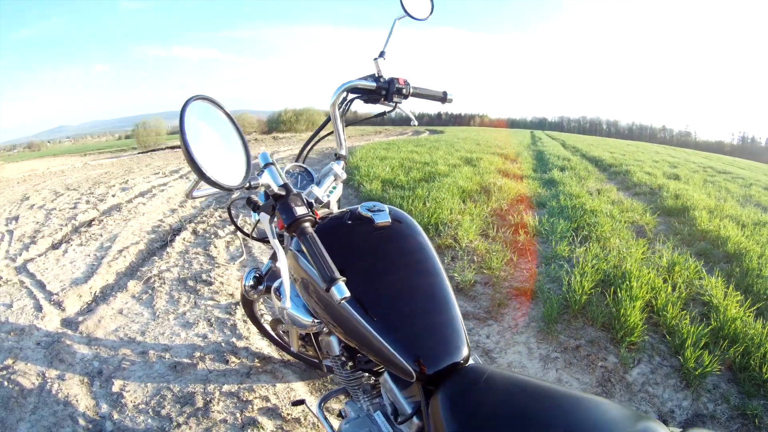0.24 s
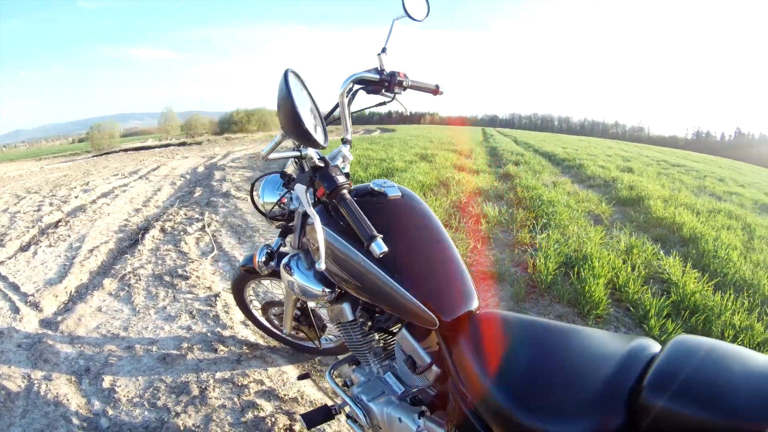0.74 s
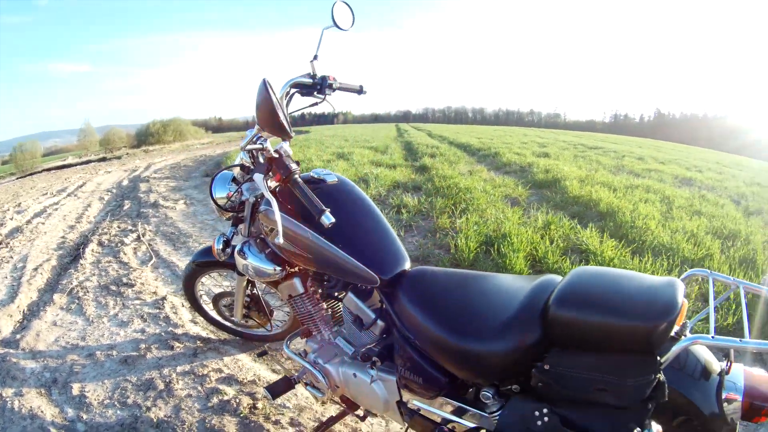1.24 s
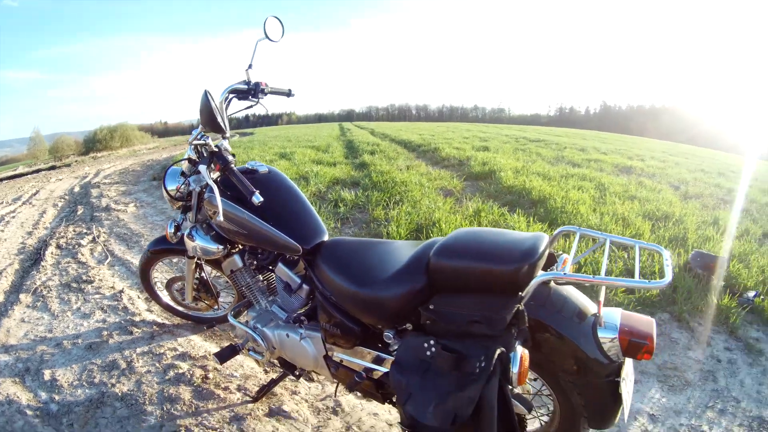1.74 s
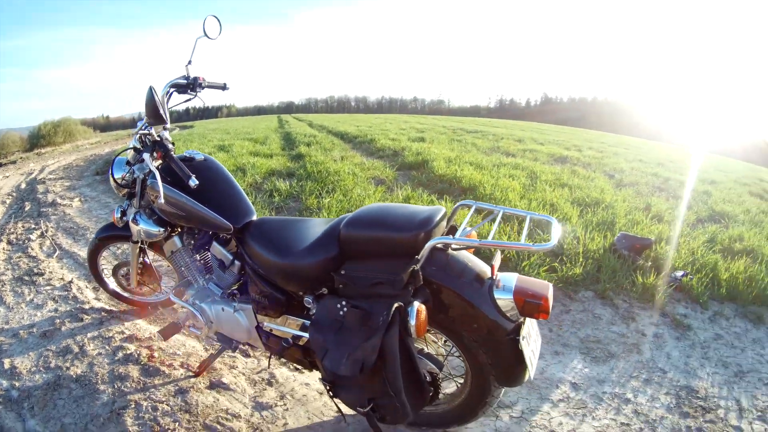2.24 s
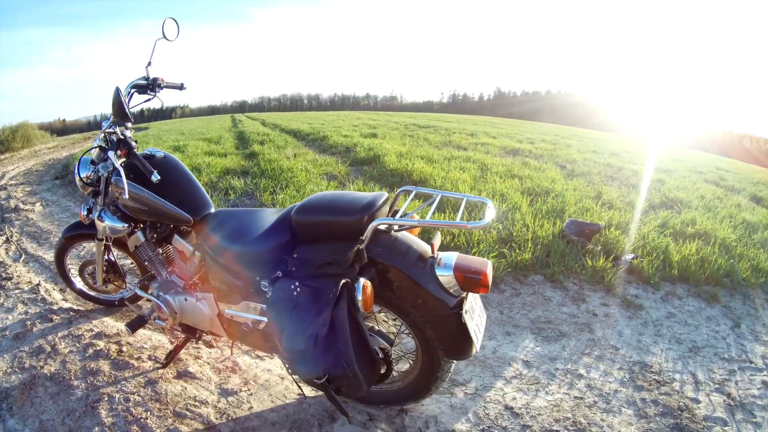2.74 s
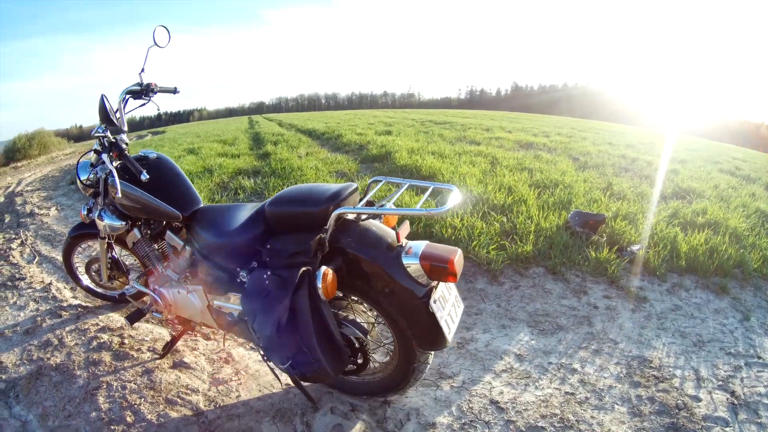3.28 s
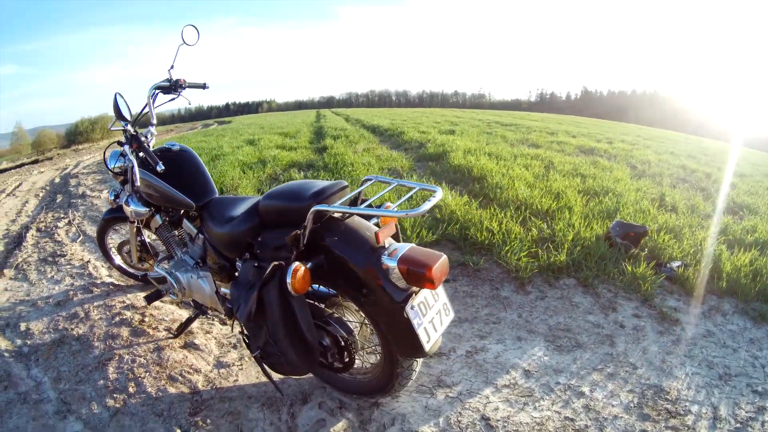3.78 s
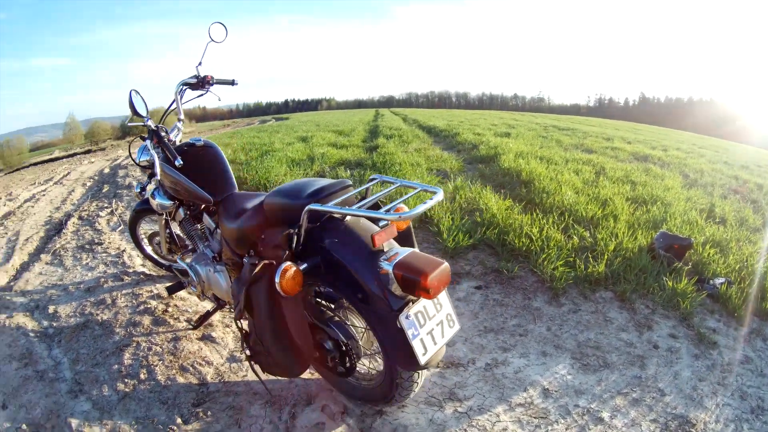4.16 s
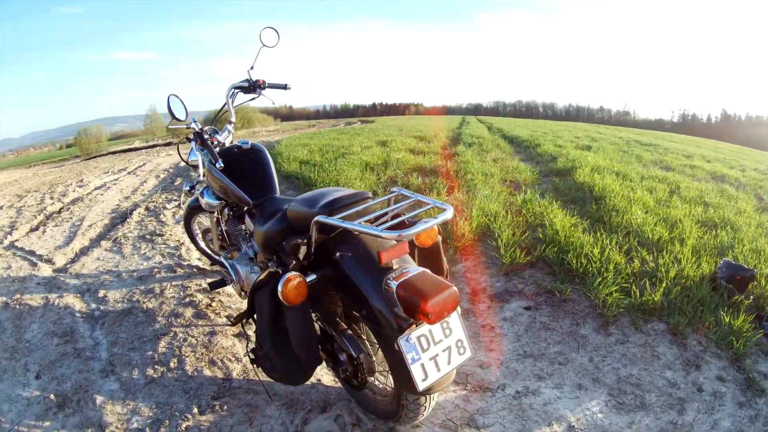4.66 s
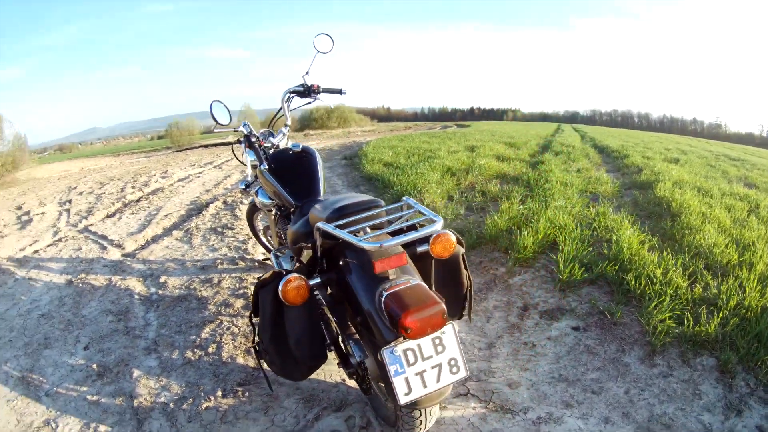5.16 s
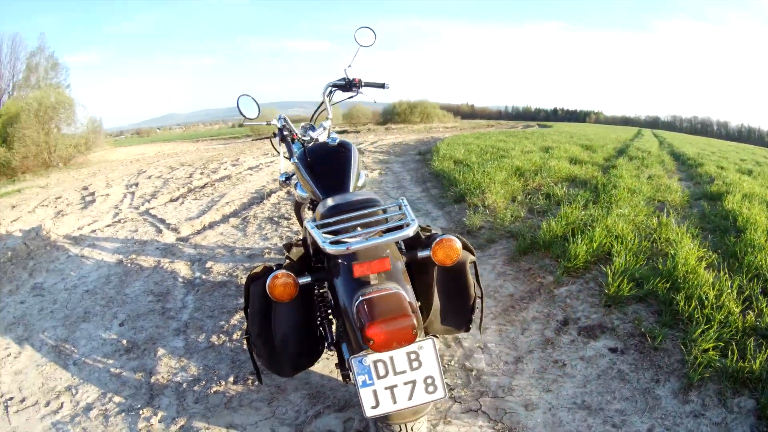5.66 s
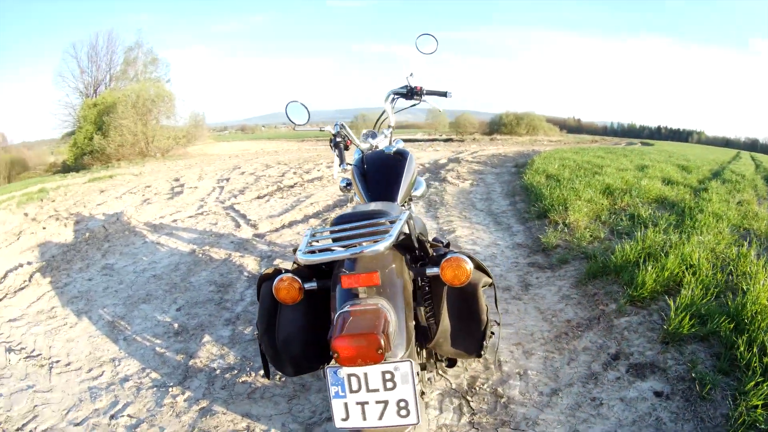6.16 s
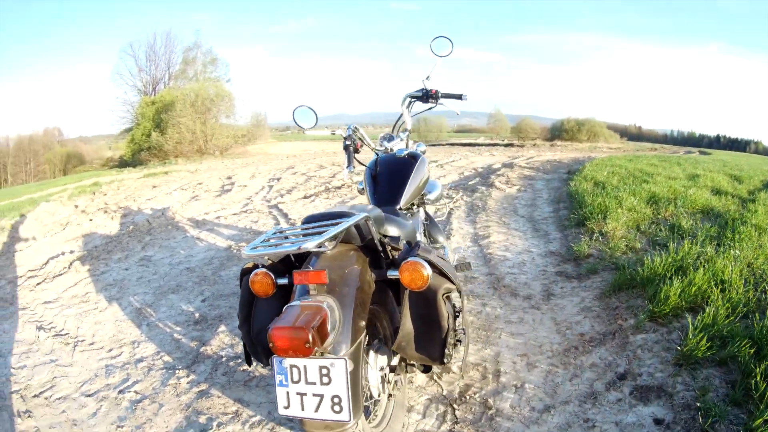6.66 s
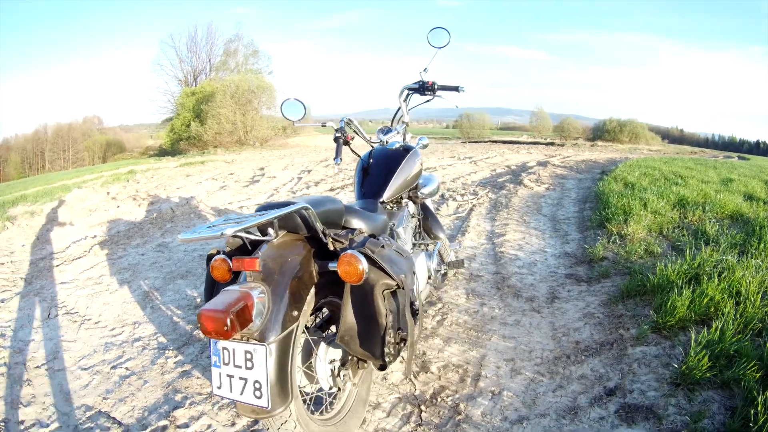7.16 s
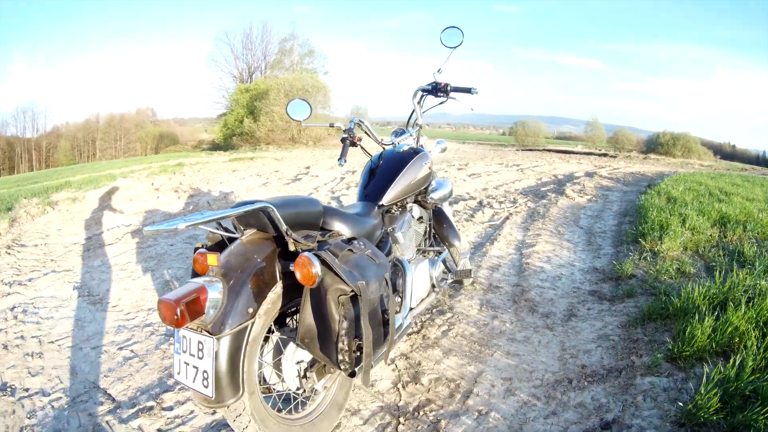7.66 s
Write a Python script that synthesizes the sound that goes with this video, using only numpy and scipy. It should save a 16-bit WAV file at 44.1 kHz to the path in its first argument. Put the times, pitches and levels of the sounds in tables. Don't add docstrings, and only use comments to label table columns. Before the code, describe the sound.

From 0 s a small air-cooled twin motorcycle engine is already idling, close, outdoors on dirt, in dry mono. Each cycle gives two uneven deep thumps around 50 to 110 Hz, roughly nine cycles a second. During the first 2 s the second beat is often weak, nearly missing around 0.4 s, so the idle lopes; intake gulps and hollow air-box huffs are strongest here, with chain whirr and ticking valves. By 2.5 to 4 s the pace rises to about ten cycles a second and the beats grow more even as the microphone moves toward the rear. From 4 to 6 s, behind the tail, exhaust thumps and gas puffs lead, the intake more distant with a thin whistle. From 6 to 8 s the far side brings brighter valve clacks, with the idle wavering slightly faster. Low frame rumble and faint air hiss continue throughout; it never revs or stops.

```python
import sys
import numpy as np
from scipy import signal
from scipy.fft import rfft, irfft, next_fast_len
from scipy.io import wavfile
from scipy.ndimage import uniform_filter1d

SR = 44100
rng = np.random.default_rng(int(sys.argv[2]) if len(sys.argv) > 2 else 0)


def elevation(decibels):
    levels = np.asarray(decibels, float)
    return 10 ** (levels / 20)


def wav_record(signal):
    frames = np.transpose(np.atleast_2d(signal))
    bounded = np.clip(frames, -1, 1)
    quanta = np.round(bounded * 32767).astype(np.int16)
    wavfile.write(sys.argv[1], SR, quanta)


N = 349713

# (frequency [Hz], width [Hz], signed strength [ratio])
PIPE_ONE = [(106, 17.4, -1), (47.4, 14.9, .307)]
PIPE_TWO = [(86.9, 15.7, -1), (45.4, 11.1, .4)]
# (time [s], engine cycle [ms])
PACE = [(0, 115.07), (0.75, 110.95), (1.19, 111.49), (1.3, 107.57), (2.27, 107.53), (2.58, 98.39),
        (2.98, 101.85), (3.28, 97.46), (3.67, 99.53), (3.97, 93.96), (4.36, 103.71), (4.76, 96.76),
        (5.43, 94.27), (6.58, 96.94), (6.77, 91.83), (7.23, 94.21), (7.51, 88.89), (7.9, 97.86)]
# (time [s], level over its usual [dB])
CHARGES = [(-.05, -3), (.18, -6.5), (.29, 1.8), (.41, -14), (.52, 0), (.63, -6.5), (.86, -4), (1.08, -2.5),
           (1.19, -4.5), (1.41, -2.2), (1.84, -2.5), (1.95, -2), (2.27, -3), (2.98, -1), (3.08, 0),
           (3.18, 0.5), (3.48, 0), (3.58, -1), (4.06, 0.5), (4.16, 1.5), (4.26, 0.2), (4.56, 1.5),
           (4.66, 2), (5.05, -1.3), (5.34, -2), (5.62, -5), (6.10, 0.2), (6.38, -1), (7.6, -1.8), (7.69, 2)]
# (time [s], level over the usual [dB])
BREATHS = [(.29, -1.5), (.52, 2), (.63, -2.5), (.75, 4), (.86, -1.5), (.97, 3), (1.19, 4.5), (1.3, 3.5),
           (1.62, -1.5), (1.95, -3.5), (2.06, 1.5), (2.38, 1), (2.48, -1.5), (2.68, -3), (2.78, 2.5),
           (2.88, -3), (3.08, 1.5), (3.28, 2.5), (3.38, -2), (3.77, 1.5), (3.87, 1.5), (4.16, -4),
           (4.66, 0), (4.76, -0.5), (5.9, 1.5), (6.77, -8.5), (7.05, -1), (7.42, -2.5), (7.51, 0.5),
           (7.88, 3)]

# (peak [share of cycle], rise [share], fall [share], level [dB])
GULPS = [
    (.755, .015, .07, -4),
    (.88, .04, .03, -10),
    (.19, .025, .075, -10),
    (.35, .045, .038, -15),
]
BOOMS = [(0.72, 0.02, 0.22, -3.5), (0.31, 0.19, 0.17, -8), (0.9, .05, 0.12, -23),
         (0.0091, 0.017, 0.017, -32)]
PUFFS = [(.65, 0.15, 0.0078, -15.5), (0.056, 0.032, 0.09, -14.5), (0.2, 0.079, 0.19, -10),
         (0.48, 0.042, 0.22, -7.5), (0.76, 0.47, 0.48, -5.5)]
WHIRRS = [(.77, 0.059, 0.17, 0.5), (0.41, 0.037, 0.16, -0.77), (0.98, 0.046, 0.16, -1.2)]
DRAWS = [(.77, .022, .065, -1), (.2, .03, .06, -7)]
HOLD = .87, .06, .025
# (moment [share of cycle], level [dB])
SLAPS = [(.77, 19), (.19, 16)]
# (moment [share of cycle], level [dB])
TICKS = [(.9, 5), (.98, -2.5), (0.271, -2), (.33, -1), (.41, -5.5), (0.641, 1.5)]

# (frequency [Hz], width [Hz], level [dB])
AIR_BOX = [(420.4, 45, 2), (264, 600, -17)]
TAIL_PIPE = [(519.4, 48.4, 2.5), (655.3, 81, -0.5)]
TAPPETS = [(7136, 200, 0), (8000, 770, -10), (9760, 1600, -16)]
# (frequency [Hz], width [Hz], side [dB], rear quarter [dB], tail [dB], far quarter [dB])
INLET = [(828, 128, -4, -2, -1.5, -3), (946, 75, -0.5, -3, 0, 2), (1042.4, 27, -3.5, 3, 5.5, 4),
         (1403, 41, -19.5, -12, -5, -16.5), (1173, 158, -7.5, -4.5, -1.5, -2.5),
         (1560, 170, -16, -10, -10, -10.5), (1711, 50, -11, -6.5, -15, -14),
         (2007, 130, -22.5, -18.5, -19.5, -17.5), (2640, 1100, -24, -27, -26, -28)]
# (frequency [Hz], wander [Hz], held draw [dB], then the same four views [dB])
THROAT = [(1399, 20, -2, -14, -8, 3, -3), (1045, 20, -6, -4, -1, 2, 2), (960, 25, -14, -2, -6, -12, -5)]
# (frequency [Hz], 60 dB decay [s], then the same four views [dB])
CLACK = [(2350, .08, -57, -57, -54, -54), (2910, .06, -66, -66, -58, -51), (3600, .065, -66, -66, -60, -54),
         (5750, .03, -68, -70, -70, -60), (8120, .04, -76, -74, -76, -61)]
# (frequency [Hz], width [Hz], then the same four views [dB])
CASE_HUM = [(3830, 26, -61.5, -81, -68, -68.5), (4583, 120, -60.5, -61, -75, -73),
            (5110, 210, -66.5, -63.5, -77.5, -79), (5530, 58, -60.5, -64.5, -77.5, -77),
            (7030, 87, -80.5, -66, -78, -94)]

# (frequency [Hz], density [dB per Hz])
CASES = [(600, -64), (1300, -2), (1800, 6.5), (2400, 4), (2800, -5), (3150, -11), (3600, -5), (4200, -4),
         (4600, -6.5), (5200, -9.5), (5700, -11.5), (6300, -19), (7500, -28), (12000, -75.5)]
RUMBLE = [(10, -25), (25, 3), (60, 5), (150, -1.5), (300, -12.5), (500, -41), (1000, -120)]
AIR = [(1500, -40), (3000, -7), (5000, -9), (6400, -14), (9000, -14), (12000, -15), (14000, -17),
       (16000, -24)]
# (frequency [Hz], level [dB])
WHINE = [(2751, -82.5), (3596, -76.5)]

BEARINGS = [104, 121, 139, 157, 169, 187, 205]
PIPE_ONE_DB = [-2.5, -3.5, -4.5, -4, -3, -3, -1.7]
PIPE_TWO_DB = [-3, -5, -4.5, -7, -3.5, -5, -4.5]
GULP_DB = [-22.5, -24, -26.5, -30.5, -31, -34, -31.5]
BOOM_DB = [-27, -32.5, -33.5, -42.5, -39, -40.5, -41.6]
PUFF_DB = [-35.5, -34, -37.5, -32.5, -30, -31, -32.5]
WHIRR_DB = [-54.5, -55, -57, -58, -58.5, -62.5, -57.5]
RING_DB = [-66.5, -60, -59.5, -63.5, -66, -84.5, -76.5]
VIEWS = [(113, 0), (128, 1), (149, 1), (169, 2), (185, 2), (200, 3)]

FIRST_S, COUNT = .0661, 80
START_DEG, DEG_PER_S = 95, 15


def exhaust():
    second_share = .4216
    early_ms_per_db = .3
    first_s, cycle_s = firings()[:-1], np.diff(firings())
    charge_db = odd(CHARGES)
    scatter_db = rng.standard_normal((COUNT, 2)) * [.25, .3]
    one_db = heard(PIPE_ONE_DB, first_s) + scatter_db[:, 0] + .6
    two_db = heard(PIPE_TWO_DB, first_s) + charge_db + scatter_db[:, 1] + .8
    second_s = first_s + second_share * cycle_s + early_ms_per_db * charge_db / 1000
    one = thump(first_s, one_db, PIPE_ONE, soft_hz=211, lead_ms=8.6)
    return one + thump(second_s, two_db, PIPE_TWO, soft_hz=157, lead_ms=10.4)


def thump(seconds, db, pipe, soft_hz, lead_ms):
    f = np.fft.rfftfreq(SR, 1 / SR)
    ring = sum(g * c / (c * c - f * f + 1j * f * w) for c, w, g in pipe)
    ring = ring / (1 + 1j * f / soft_hz) ** 2
    swell = 1 - 1 / (1 - 1j * f / 20.4)
    shape = np.roll(irfft(ring * swell), SR // 2 - round(lead_ms * SR / 1000))
    return signal.fftconvolve(spikes(seconds, db), shape / shape.max())[SR + SR // 2:][:N]


def intake(boom_db, view):
    turn, usual_db = crank(), heard(GULP_DB, np.arange(N) / SR)
    own_db = np.append(odd(BREATHS), 0)[np.ceil(turn).astype(int)]
    fade_in = np.clip((turn % 1 - .62) / 0.023, 0, 1)
    fade_out = np.clip((1 - turn % 1) / 0.038, 0, 1)
    strength = elevation(usual_db + own_db * fade_in * fade_out + 23.5)
    slaps = sum(beats(share, db, scatter_db=2) for share, db in SLAPS)
    flow = strength * openings(GULPS, rest_db=-16, scatter_db=1)
    blows = muffled(strength * seen(view, [0, -3, -8, -5]) * slaps, 2000)
    throat = strength * whistle(view)
    hiss = muffled(coloured(flow, blows, INLET, view) + throat, 2500)
    box_flow = openings(BOOMS, rest_db=-15, scatter_db=0) * noise()
    boom = muffled(box_flow + elevation(-1.5) * slaps, 760)
    return hiss + elevation(boom_db) * unit(filtered(boom, modes(AIR_BOX)))


def whistle(view):
    total = 0
    for hz, wander_hz, hold_db, *dbs in THROAT:
        drift = unit(uniform_filter1d(noise(), size=900))
        tone = np.sin(2 * np.pi * np.cumsum(hz + wander_hz * drift) / SR)
        draw = openings(DRAWS + [(*HOLD, hold_db)], rest_db=-30, scatter_db=2.5)
        total = total + seen(view, dbs) * draw * tone
    return elevation(-23) * total


def tail_pipe(puff_db):
    flow = muffled(openings(PUFFS, rest_db=-9, scatter_db=2) * noise(), 900)
    return elevation(puff_db - 1.25) * unit(filtered(flow, modes(TAIL_PIPE)))


def mechanism(whirr_db, ring_db):
    t = np.arange(N) / SR
    flow = openings(WHIRRS, rest_db=-4, scatter_db=2) * noise()
    whirr = unit(filtered(flow, shaped(CASES)))
    blows = sum(beats(share, db, scatter_db=2.5) for share, db in TICKS)
    decay = elevation(-60 * t[:SR // 10] / 0.074)
    rattle = signal.fftconvolve(blows, decay)[:N] + elevation(-11.0)
    tappets = modes(TAPPETS)
    ring = unit(filtered(rattle * noise(), lambda f: tappets(f) * (f > 6400) / (1 + (f / 10500) ** 8)))
    whine = sum(elevation(db + 3.5) * np.sin(2 * np.pi * hz * t) for hz, db in WHINE)
    return elevation(whirr_db + 6.0) * whirr + elevation(ring_db - 1.0) * ring + whine


def valve(view):
    t = np.arange(SR // 5) / SR
    clack = 0
    for hz, t60, *dbs in CLACK:
        seat = beats(.34, 0, scatter_db=3.5) + beats(.95, -4, scatter_db=3.5)
        ring = elevation(-60 * t / t60) * np.sin(2 * np.pi * hz * t) * (1 - np.exp(-t / 0.00043))
        clack = clack + seen(view, dbs) * signal.fftconvolve(seat, ring)[:N]
    blows = beats(.92, 0, scatter_db=2.5) + beats(.31, 0, scatter_db=2.5)
    burst = signal.fftconvolve(blows, elevation(-60 * t / .02))[:N] * noise()
    snap = filtered(burst, modes([(6000, 1500, 0), (8650, 3000, -1.8)]))
    snap = seen(view, [-49.0, -55, -66.5, -52.5]) * snap
    shake = openings(WHIRRS, rest_db=-4, scatter_db=2)
    return clack + snap + elevation(19.0) * coloured(shake, 0, CASE_HUM, view)


def field():
    air = elevation(-70) * unit(filtered(noise(), shaped(AIR)))
    return elevation(-29) * unit(filtered(noise(), shaped(RUMBLE))) + air


def firings():
    when, ms = np.transpose(PACE)
    s = [FIRST_S - ms[0] / 1000, FIRST_S]
    while len(s) <= COUNT:
        s.append(s[-1] + np.interp(s[-1], when, ms) / 1000)
    return np.array(s)


def crank():
    return np.interp(np.arange(N) / SR, firings(), np.arange(COUNT + 1))


def odd(events):
    when, db = np.transpose(events)
    change = np.zeros(COUNT)
    change[np.abs(firings()[:COUNT, None] - when).argmin(axis=0)] = db
    return change


def openings(table, rest_db, scatter_db):
    turn, power = crank(), elevation(rest_db) ** 2
    for share, rise, fall, db in table:
        cycle = np.round(turn - share).astype(int)
        size = elevation(db + scatter_db * rng.standard_normal(COUNT + 2))[cycle]
        late = turn - share - cycle
        bump = np.exp(-.5 * (late / np.where(late < 0, rise, fall)) ** 2)
        power = power + (size * bump) ** 2
    return np.sqrt(power)


def beats(share, db, scatter_db):
    chance = rng.standard_normal((COUNT, 2))
    turns = np.arange(COUNT) + share + 0.0087 * chance[:, 0]
    when = np.interp(turns, crank(), np.arange(N) / SR)
    return spikes(when, db + scatter_db * chance[:, 1])[SR:SR + N]


def spikes(seconds, db):
    x = np.zeros(N + 2 * SR)
    np.add.at(x, np.round((seconds + 1) * SR).astype(int), elevation(db))
    return x


def bearing(seconds):
    return START_DEG + DEG_PER_S * seconds


def heard(dbs, seconds):
    return np.interp(bearing(seconds), BEARINGS, dbs)


def seen(view, dbs):
    return elevation(np.interp(view, np.arange(len(dbs)), dbs))


def coloured(flow, blows, table, view):
    total = 0
    for c, w, *dbs in table:
        peak = signal.iirpeak(c, c / (1.5 * w), SR)
        once = signal.lfilter(*peak, flow * noise() + blows)
        total = total + seen(view, dbs) * signal.lfilter(*peak, once)
    return total


def muffled(x, corner_hz):
    return filtered(x, lambda f: 1 / (1 + 1j * f / corner_hz) ** 2)


def modes(table):
    def response(f):
        total = 0
        for k, (c, w, db) in enumerate(table):
            total = total + (-1) ** k * elevation(db) * 1j * f * w / (c * c - f * f + 1j * f * w)
        return total
    return response


def shaped(points):
    hz, db = np.transpose(points)
    return lambda f: elevation(np.interp(np.log(f + 1), np.log(hz + 1), db))


def filtered(x, response):
    m = next_fast_len(N + SR // 2)
    return irfft(rfft(x, m) * response(np.fft.rfftfreq(m, 1 / SR)), m)[:N]


def unit(x):
    return x / np.sqrt(np.mean(x ** 2) + 1e-20)


def noise():
    return rng.standard_normal(N)


def scene():
    t = np.arange(N) / SR
    view = np.interp(bearing(t), *np.transpose(VIEWS))
    engine = exhaust() + intake(heard(BOOM_DB, t), view) + tail_pipe(heard(PUFF_DB, t))
    engine = engine + mechanism(heard(WHIRR_DB, t), heard(RING_DB, t)) + valve(view)
    return (engine + field())[None]


def low_pass(x):
    return signal.sosfilt(signal.butter(12, 15700, fs=SR, output="sos"), x)


def record(dry):
    level = dry / (1 + np.abs(dry / .95) ** 6) ** (1 / 6) - .0028
    return low_pass(level)


dry = scene()
out = record(dry)
wav_record(out)
```